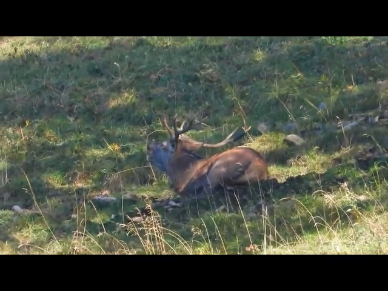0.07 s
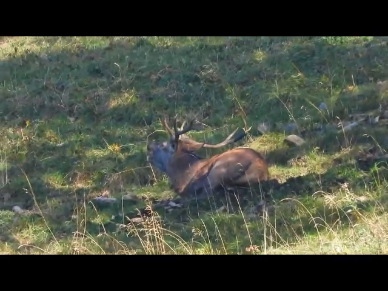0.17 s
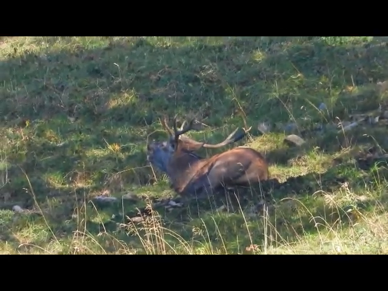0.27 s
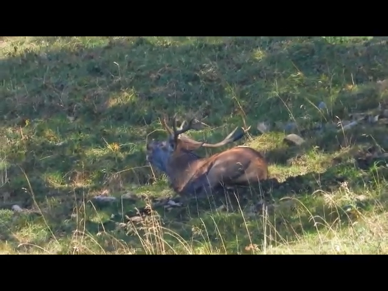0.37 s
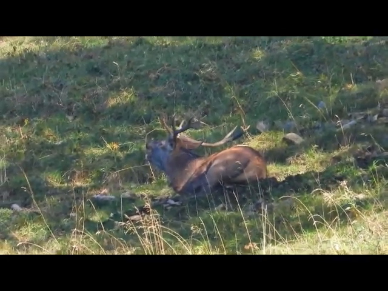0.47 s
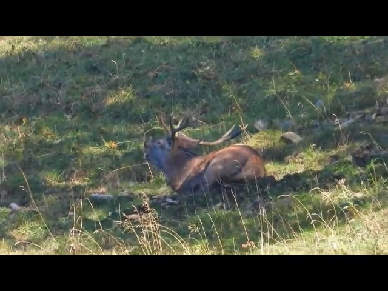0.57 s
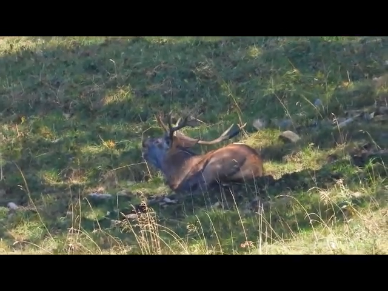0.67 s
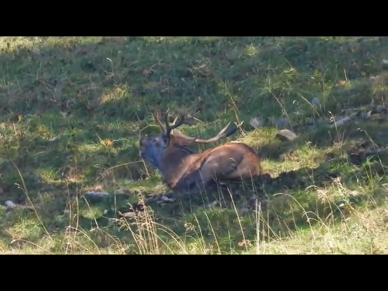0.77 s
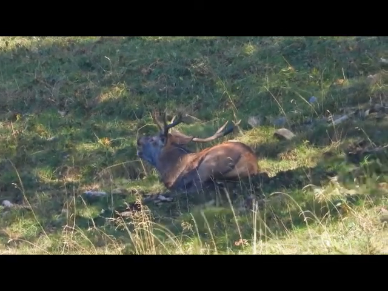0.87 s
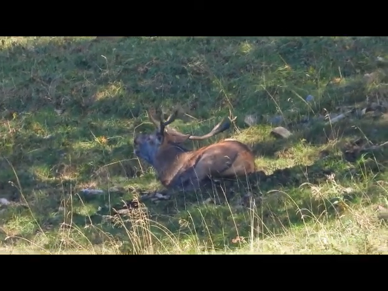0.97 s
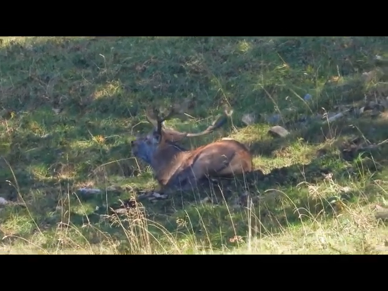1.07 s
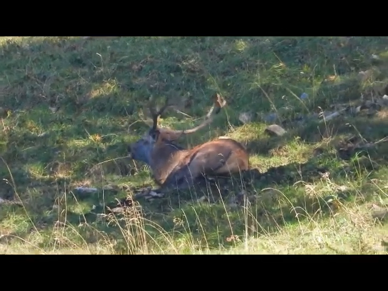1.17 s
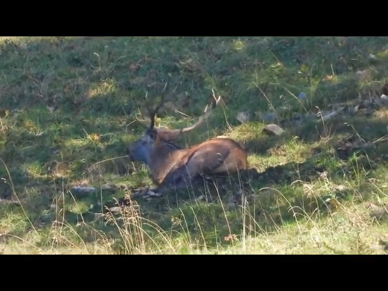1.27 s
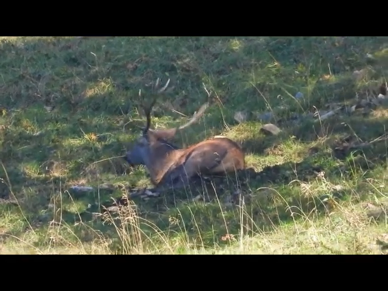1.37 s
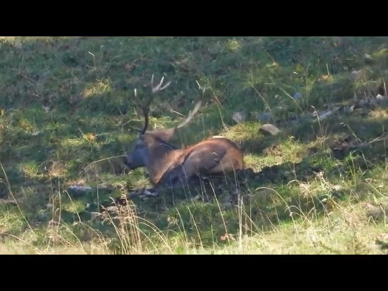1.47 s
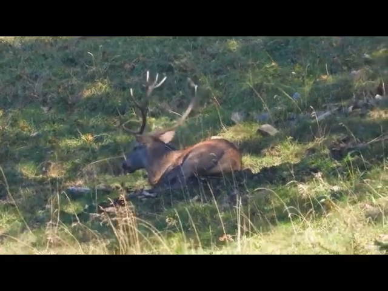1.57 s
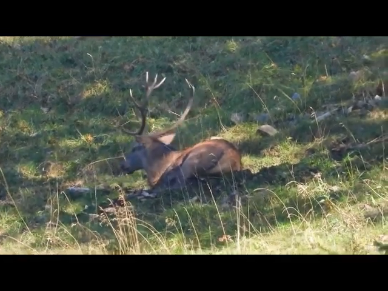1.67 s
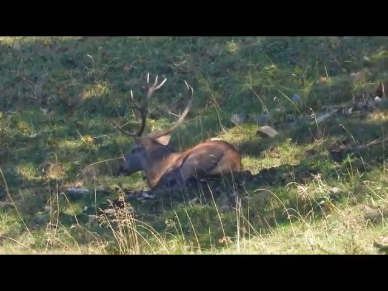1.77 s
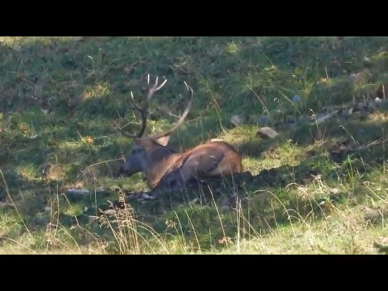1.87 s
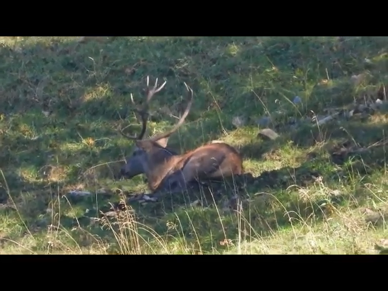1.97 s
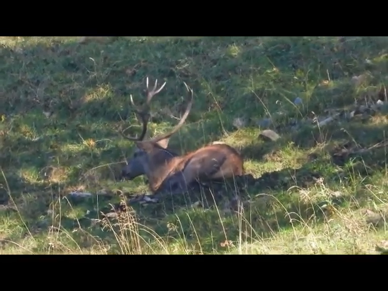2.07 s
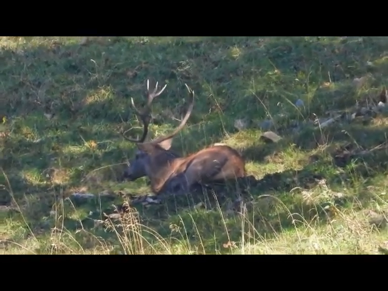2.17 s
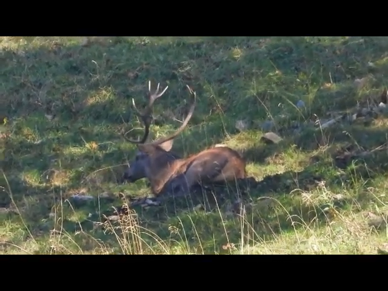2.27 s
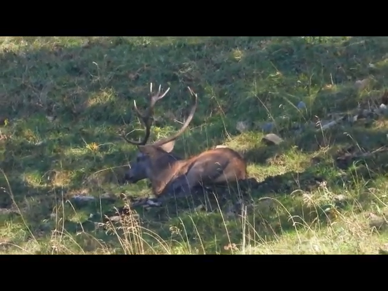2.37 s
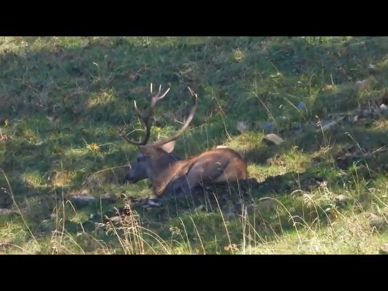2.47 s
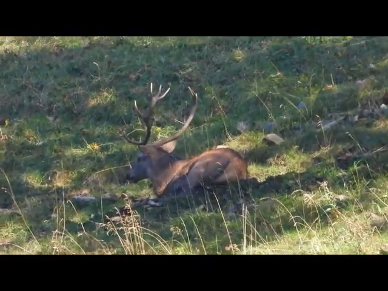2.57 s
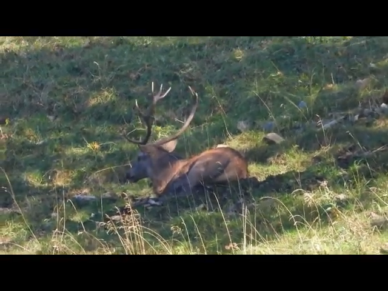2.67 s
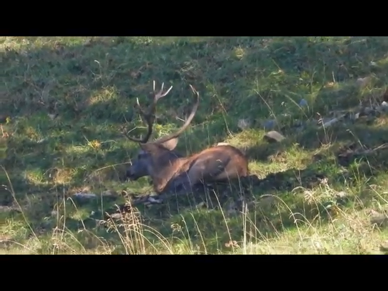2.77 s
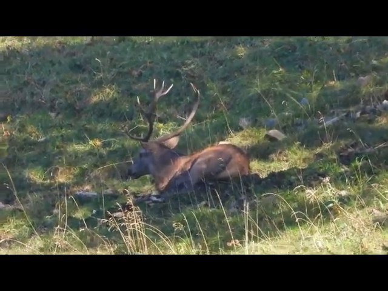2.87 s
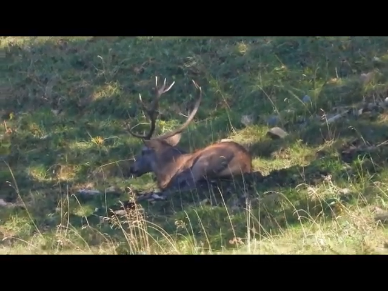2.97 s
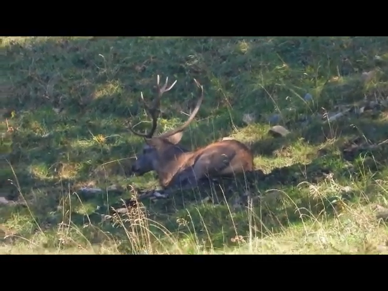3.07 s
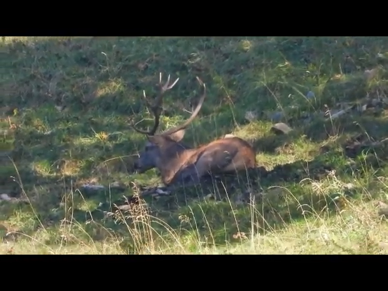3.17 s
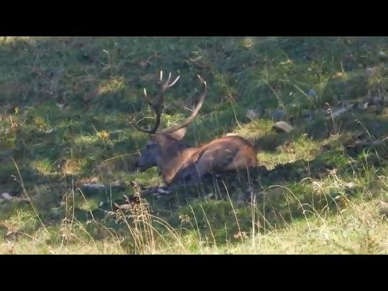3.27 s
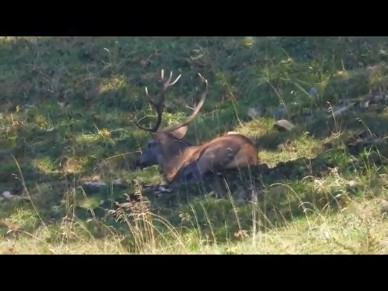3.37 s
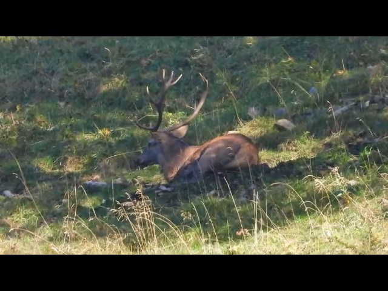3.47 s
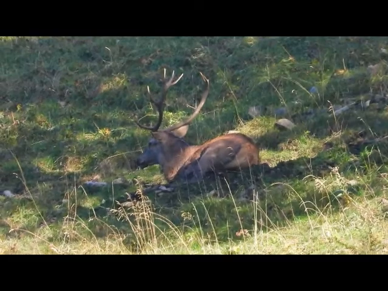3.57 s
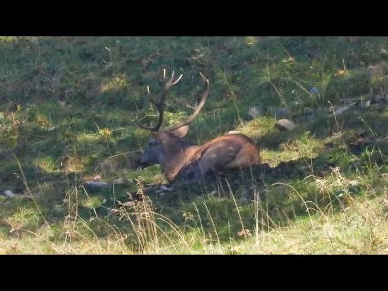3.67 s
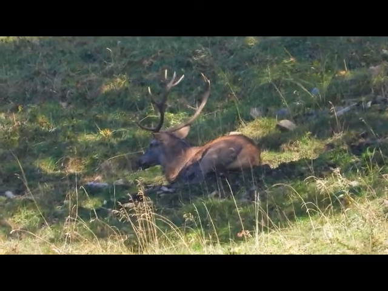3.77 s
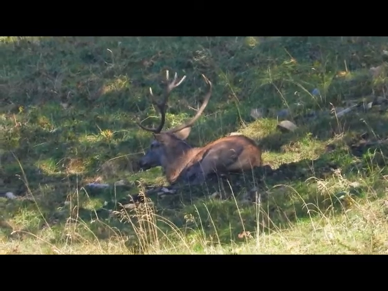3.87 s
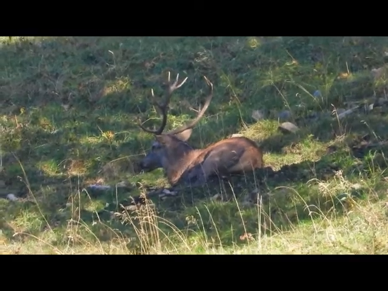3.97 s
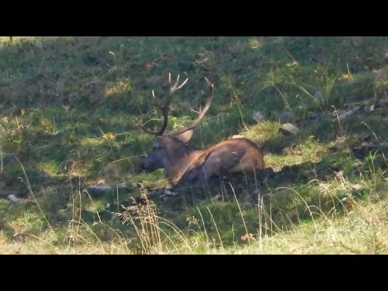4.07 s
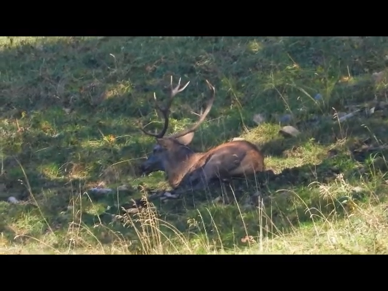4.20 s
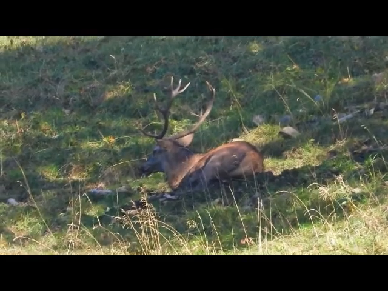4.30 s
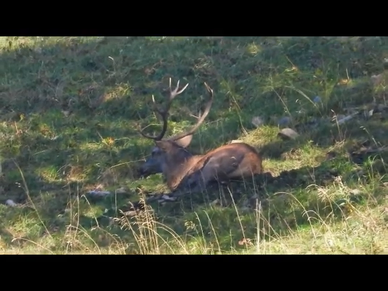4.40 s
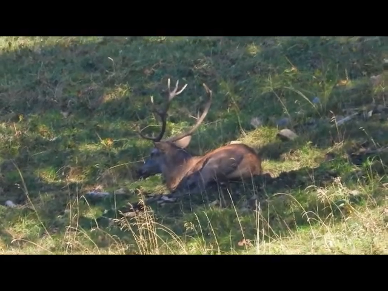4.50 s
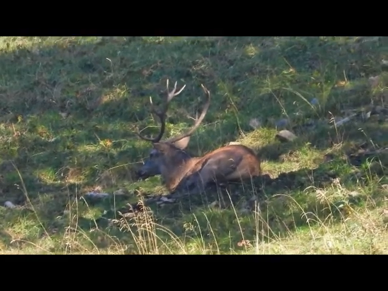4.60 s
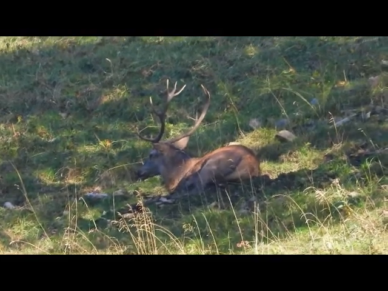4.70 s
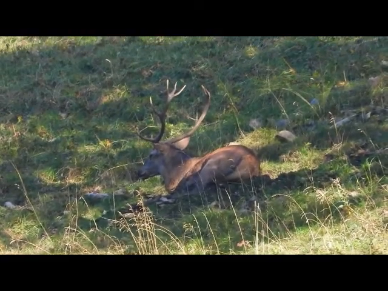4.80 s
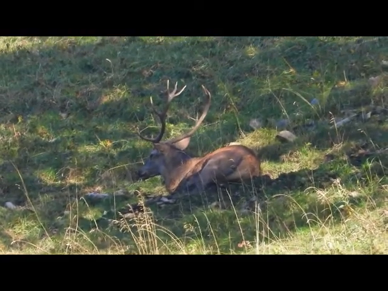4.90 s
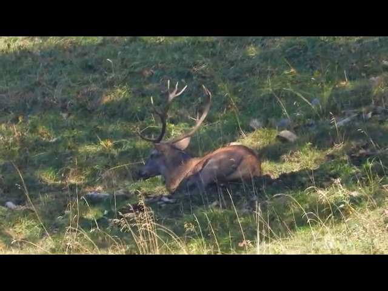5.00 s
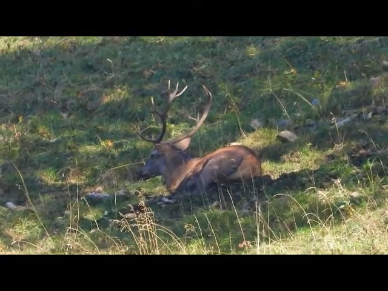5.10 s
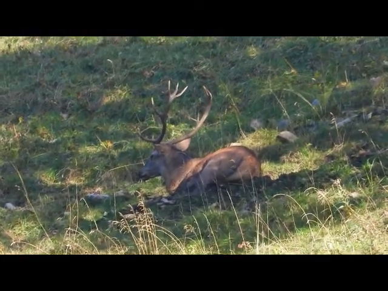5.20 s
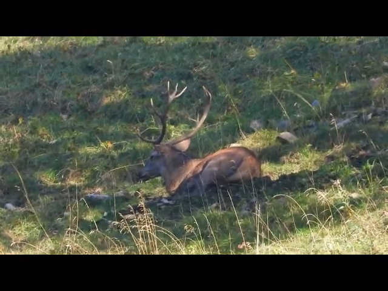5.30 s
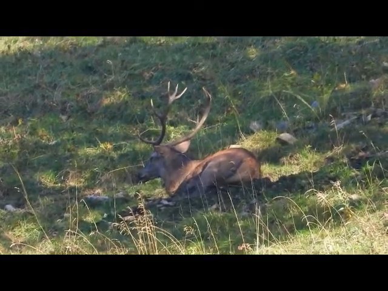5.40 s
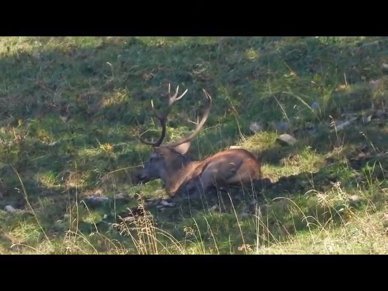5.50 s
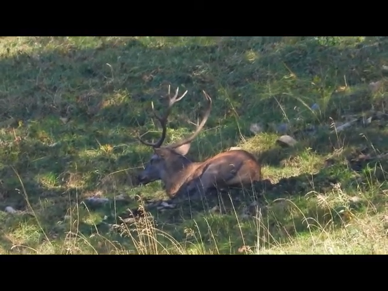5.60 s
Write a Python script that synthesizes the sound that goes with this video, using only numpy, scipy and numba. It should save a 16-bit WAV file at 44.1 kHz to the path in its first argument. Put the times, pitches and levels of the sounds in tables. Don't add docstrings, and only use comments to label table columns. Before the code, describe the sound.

The opening is mono and windy: rustling air over a slope, low thuds and flutters on the microphone, a faint high cricket hum and the fading echo of an earlier roar. A stag gives a full, rattling grunt from 0.23 to 0.55 s, rising then sagging and roughening, with short reflections off ground and hill. A weaker, lower grunt follows at 0.85-1.0 s. A third begins at 1.3 s, rising with hollow chest thumps and a strong gust, and is cut off at 1.4 s. Instantly the place becomes a quiet stereo wood edge. Small birds warble and give thin high whistles; a loud rising whip-crack call comes at 2.3, 3.1 and 5.1 s. From 2.5 s fluted thrush notes, falling finch twitters, hoarse chirps and rapid wren notes thicken the song. Tree echoes and a blurred distant chorus continue; chips close at 5.4-5.6 s.

```python
import sys
import numpy as np
from scipy import signal
from scipy.fft import rfft, irfft
from scipy.io import wavfile
from scipy.ndimage import uniform_filter1d
from numba import njit

SR = 44100
rng = np.random.default_rng(int(sys.argv[2]) if len(sys.argv) > 2 else 0)


def put_to_file(sound):
    columns = np.atleast_2d(sound).T
    safe = np.clip(columns, -1, 1)
    whole_steps = np.round(safe * 32767)
    wavfile.write(sys.argv[1], SR, whole_steps.astype(np.int16))


def natural_amplitude(level_db):
    exponent = np.asarray(level_db, float) / 20
    return 10 ** exponent


N = 249165
T = np.arange(N) / SR
SPLICE_S = 1.4155

# frequency in Hz, level in dB per Hz.
SLOPE_AIR = [(59, -26), (100, -28), (238, -5.5), (522, -1), (632, 1), (2070, -5), (2350, -4.5), (3910, -14),
             (5040, -15), (5610, -11), (5980, -17.5), (7230, -15.5), (15800, -32.5)]
# centre in seconds, half length in s, thud in dB, flutter above it in dB.
GUSTS = [
    (0.053, 0.1, -46.5, -26),
    (0.213, 0.018, -60, 22),
    (0.323, 0.065, -46, -5),
    (0.447, 0.09, -49, 17.5),
    (0.575, 0.098, -45, -38),
    (0.926, 0.081, -47.5, 4.5),
    (1.13, 0.34, -59, 7),
    (1.345, 0.051, -39.5, 13.5),
]
# frequency in Hz, width in Hz, level in dB.
CRICKET = (5530, 100.6, -52.5)

# time in seconds, pulse rate in Hz, effort in dB,
# windpipe resonance stretch (ratio), mouth brightness in dB.
GRUNTS = [
    [(.2318, 59.24, -19.5, 1.04, -1.5), (.256, 87.84, -16, 1.015, 2.5), (.288, 101.1, -13.5, 1.04, 2),
     (.375, 101.9, -14.5, 0.99, 4.5), (.42, 101, -15.5, 0.985, 5.5), (.45, 97.73, -11, 0.976, 0.5),
     (.482, 89.34, -11.5, 0.98, 3.5), (.505, 78.13, -18, 1.05, -2), (.521, 73.77, -17.5, 1.04, 0),
     (.536, 71.3, -17.5, 1.07, -6), (.552, 68.3, -22, 1.06, -11.5)],
    [(.8528, 58.9, -23.5, 0.99, 6.5), (.885, 67, -16.5, 1.02, -0.5), (.91, 69.6, -18.5, 0.94, -1),
     (.93, 64.74, -22.5, 1.05, 4.5), (.947, 62.1, -18.5, 1.05, 1), (.962, 69.5, -21.5, 1, -7),
     (1.0, 69, -36, 1.03, -14)],
    [(1.2985, 46.4, -21.5, 1.02, -4), (1.33, 67.6, -18.5, 0.97, 0.5), (1.345, 74.3, -16.5, 1.035, 0),
     (1.36, 81.27, -15.5, 0.98, -2), (1.39, 88.4, -17, 1.017, -0.5), (1.42, 90.8, -16.5, 1.005, -1.5)],
]
# frequency in Hz, width in Hz, level in dB.
WINDPIPES = [
    [(486, 33.5, 0.5), (645.4, 38, 6.5), (952, 26.7, 4.5), (1332, 23, 2.5), (1519, 24, -8),
     (1768, 64, -9.5), (2030, 52, -1.5), (2300, 120, -2), (2719, 100, -3.5), (2950, 75, -8),
     (3160, 53, -8.5), (3427, 59.6, -9.5)],
    [(568, 69, -4), (746, 32, 2), (935, 69, -13), (1113, 17.4, 7.5), (1510, 79, -8.5), (1750, 31, -10.5),
     (2144, 160, -12), (2504, 235, -8.5), (2650, 254, -14), (2900, 173, -12), (3460, 99, -19)],
    [(615, 37, 3.5), (765, 65, 3), (1027, 69, -6.5), (1322, 45, 3.5), (1495, 110, -2.5), (1750, 36, 4),
     (2154, 22, -2), (2345, 68, 2), (2603, 170, -3), (2920, 51, -1), (3296, 70, -10), (3550, 180, -11.5)],
]
MOUTH_GAINS = [
    [-0.27, -0.074, -0.15, -0.12, 1.2, -1.36, -1, 0.24, -0.049, 0.79, -0.31, 0.87],
    [.1, .1, .1, 0.075, 0.093, .1, .1, .1, .1, .1, .1],
    [.1, .1, .1, .1, .1, .1, .1, .1, .1, .1, .1, .1],
]
ROUGHNESS = [
    (.12, .5),
    (.2, .4),
    (.2, .25),
]
# centre in seconds, half length in s, change in dB.
BREATH_WAVERS = [
    (0.29, 0.036, -2),
    (0.465, 0.013, -4.5),
    (0.2, 0.028, 0),
    (0.28, .005, 3.5),
]
# frequency in Hz, width in Hz, level in dB.
NOSE = (4120, 480, -42)
# start in seconds, frequency in Hz, ring (T60) in s, level in dB.
CHEST_THUMPS = [
    (1.332, 417, 0.055, -18),
    (1.337, 241, .14, -22),
    (1.353, 325, 0.035, -33),
]

# frequency in Hz, level in dB per Hz.
WOOD_AIR = [(15, -35), (25, -3), (70, 1), (148, -11), (437, -11), (1400, -24), (2090, -25), (2810, -16),
            (3310, -15), (3590, -22), (5530, -22), (7240, -41), (8300, -43), (10000, -40), (15800, -37)]
# start in seconds, end in s, low edge in Hz, high edge in Hz, level in dB.
CHORUS = [(1.2, 1.69, 2870, 3420, -56.5), (1.3, 1.6, 6900, 7800, -69.5), (2.2, 2.35, 2780, 3350, -64.5),
          (2.44, 3.807, 3540, 5400, -52.5), (2.97, 4.298, 2430, 4470, -50.5), (2.904, 2.7, 6100, 6760, -48),
          (4, 4.42, 3700, 7600, -67), (4.96, 5.702, 2440, 3200, -64), (4.596, 5.26, 5750, 7160, -60.5),
          (5.203, 5.7, 3400, 5500, -54.5), (4.3, 5.05, 9800, 10600, -80), (3.75, 4.02, 9600, 10300, -79)]
# time in seconds, pitch in Hz, level in dB.
WARBLER_SHAPE = [(0, 2650, -4), (.06, 3320, -4), (.085, 3380, -1.5), (.13, 2950, 0.5), (.2, 2720, -7.5)]
# start in seconds, level in dB.
WARBLER = [
    (1.441, -56),
    (2.027, -56.5),
]
# start in seconds, length in s, start Hz, end Hz, level in dB.
PIPIT = [(1.545, 0.03, 6700, 4680, -47), (1.572, 0.13, 4730, 4520, -54), (1.71, 0.14, 3860, 3830, -65),
         (1.885, .12, 3820, 3750, -67), (2.09, 0.16, 3730, 3800, -66.5), (1.99, 0.072, 3230, 3250, -63.5),
         (2.69, 0.025, 5400, 5650, -56), (2.72, 0.022, 5600, 4600, -60), (4.238, 0.041, 3300, 4010, -52),
         (4.275, 0.053, 4250, 4420, -50.5), (4.335, 0.053, 4360, 4600, -67), (4.46, 0.012, 5250, 5800, -50),
         (5.485, 0.024, 3900, 3980, -50), (5.587, .04, 4200, 4960, -52), (3.3, .09, 4300, 2290, -46),
         (3.515, .075, 4700, 2250, -48.5), (3.228, .035, 4900, 6730, -59), (3.437, .028, 5400, 6890, -59),
         (3.642, .028, 5500, 6460, -65.5), (3.75, .04, 4700, 2700, -57), (3.89, .03, 4300, 2750, -61),
         (4.098, .025, 4400, 3310, -58), (2.943, .03, 4300, 3360, -53), (2.74, 0.069, 5070, 4880, -50.5),
         (2.8, 0.027, 5040, 4380, -59), (3.165, 0.05, 5180, 4800, -45), (2.527, 0.061, 4390, 2900, -72),
         (4.36, 0.031, 5050, 4550, -51), (4.44, 0.019, 6000, 5100, -56), (4.555, 0.028, 4100, 4580, -54),
         (4.58, 0.019, 4520, 4570, -48), (4.736, 0.056, 4110, 5000, -50.5), (5.105, 0.057, 5140, 4710, -50),
         (5.23, 0.022, 5150, 4250, -51), (5.32, 0.033, 5120, 3390, -54)]
# start in seconds, length in s, low edge in Hz, high edge in Hz, level in dB.
SCRATCHES = [
    (1.545, 0.027, 4300, 13000, -56),
    (1.75, 0.02, 4000, 12000, -58),
    (2.318, 0.031, 3800, 12000, -50),
    (3.138, 0.035, 4600, 14000, -49),
    (5.069, 0.04, 3200, 14000, -49),
]
# start in seconds, length in s, start Hz, end Hz, level in dB.
TREECREEPER = [(1.75, 0.015, 6700, 4890, -44.5), (2.69, 0.11, 7540, 7180, -57),
               (2.765, 0.065, 7470, 6380, -55), (2.7, 0.15, 6900, 5680, -55), (2.95, 0.12, 7020, 7200, -58),
               (2.668, 0.043, 7500, 5920, -63), (3.83, 0.058, 5370, 5560, -61),
               (3.99, 0.06, 7550, 6360, -66.5), (4.03, 0.2, 6550, 6070, -60.5),
               (4.49, 0.11, 7600, 7320, -58), (4.565, 0.082, 7350, 6380, -52.5),
               (4.5, 0.14, 6980, 5420, -55), (4.74, 0.013, 6300, 4940, -50),
               (4.885, 0.021, 6560, 4780, -50), (4.9, 0.13, 7800, 7250, -68.5),
               (5.415, 0.014, 5550, 6000, -73), (5.428, 0.235, 5990, 5785, -57.5)]
# time in seconds, pitch in Hz, level in dB.
TIT_SHAPE = [(0, 4360, -10), (.012, 5720, 5), (.03, 6230, 1.5), (.08, 6080, -1), (.105, 5560, 0)]
# first and last start in seconds, gap in s, gap growth in s a syllable, level in dB.
TIT = (1.785, 2.7, .147, 0, -61)
# time in seconds, pitch in Hz, level in dB.
WHIP_SHAPE = [(0, 1750, -34), (.012, 2412, -18), (0.03, 3286, -10.5), (.041, 4155, -3.5),
              (0.051, 4389, 4.5), (.085, 4250, -2.5), (0.094, 4250, -7)]
# start in seconds, level in dB, length of the held part (ratio).
WHIP = [
    (2.317, -28.5, 0.89),
    (3.141, -25.5, 0.72),
    (5.068, -26.5, 1),
]
# multiple of the pitch, dB while rising, dB while held.
WHIP_OVERTONES = [(1.45, -13, -60), (2, -4, -45), (3, -24, -39), (4, -30, -48)]
# time in seconds, pitch in Hz, level in dB.
FINCH_SHAPE = [(0, 4830, 1), (.008, 4243, 3), (.022, 3305, -2.5), (.034, 2900, -3.5), (.05, 2854, -21.5)]
# first and last start in seconds, gap in s, gap growth in s a syllable, level in dB.
FINCH = (2.519, 3.12, .1065, .0012, -53)
# start in seconds, length in s, start Hz, end Hz, level in dB.
THRUSH = [(2.53, 0.065, 1376, 1655, -49.5), (2.61, 0.081, 2236, 1633, -49), (2.96, .07, 2150, 2300, -46.5),
          (3.04, 0.076, 2250, 1872, -42.5), (3.25, 0.059, 2650, 2604, -50), (3.46, 0.054, 2610, 2600, -54),
          (3.6, .08, 2300, 2390, -57), (3.643, 0.16, 1725, 1983, -44), (3.78, 0.24, 1942, 2030, -42.5),
          (4.02, 0.05, 2030, 1390, -42), (4.27, 0.044, 1963, 2360, -45), (4.31, 0.047, 2310, 2263, -39.5),
          (4.345, 0.098, 2320, 1514, -42.5), (4.49, 0.079, 2415, 2577, -45),
          (4.59, 0.097, 1953, 2190, -43.5), (4.9, 0.054, 2168, 2080, -41), (5.02, 0.043, 2130, 2070, -59),
          (5.15, 0.098, 2155, 1972, -48), (5.24, 0.049, 2088, 1750, -50)]
# start in seconds, end in s, centre in Hz, swing in Hz, level in dB.
THRUSH_WARBLES = [
    (2.937, 3.386, 2143, 330, -59),
    (4.548, 5.262, 2270, 245, -51),
]
# start in seconds, length in s, start Hz, end Hz,
# level in dB.
HOARSE = [(2.635, 0.035, 4300, 2800, -58), (2.74, .04, 4400, 2900, -55), (2.845, .04, 4400, 2900, -55),
          (2.945, .04, 4200, 3200, -53), (3.125, 0.035, 4000, 3000, -51), (3.225, .04, 4900, 6600, -55),
          (3.3, 0.085, 4300, 2280, -50), (3.435, .03, 5400, 6900, -57), (3.515, 0.07, 4700, 2300, -48),
          (3.64, .03, 5500, 6600, -58), (3.68, 0.1, 3700, 3650, -54), (3.75, .04, 4700, 2700, -54),
          (3.86, .03, 4400, 4450, -56), (3.89, .03, 4200, 2800, -56), (4.098, .025, 4400, 3300, -55),
          (4.74, .14, 2450, 2950, -56), (4.25, .18, 3700, 3700, -61)]
# time in seconds, pitch in Hz, level in dB.
WREN_SHAPE = [(0, 5240, -16), (.006, 5240, 3.5), (.016, 4750, 2)]
# first and last start in seconds, gap in s, gap growth in s a syllable, level in dB.
WREN = (3.29, 3.9, .085, 0, -61)
# time in seconds, pitch in Hz, level in dB.
CHIP_SHAPE = [(0, 3450, 0.0053), (.014, 4750, 0), (.028, 3350, 0)]
# start in seconds, level in dB.
CHIP = [
    (5.445, -58),
    (5.49, -59),
    (5.628, -49),
]
# nearness in dB, left minus right in dB, near branches in dB, far trees in dB, flutter in dB.
SEATS = dict(thrush=(4.5, -1, -1.5, 1, 3), pipit=(-2.5, -3.5, -0.5, 0, 3),
         creeper=(-0.5, 0.5, 1, -0.5, 3.5), tit=(1, -3, 4.5, 8.5, 0.5), finch=(3, -9, -1.5, -1.5, 3.5),
         wren=(5, -9, -2, 2, 4), whip=(-3.5, -2.5, -7, -16, 1.5), hoarse=(5, -3.5, -1.5, -5, 3))
LEFT_LAG_MS = dict(thrush=.215, pipit=.03, creeper=0, tit=.07, finch=-.07, wren=-.04, whip=-.033, hoarse=-.04)


def level(x, db):
    return x * natural_amplitude(db) / np.sqrt(np.mean(x ** 2))


def noise():
    return rng.standard_normal(N)


def band(x, lo_hz, hi_hz, order=2):
    return signal.sosfilt(signal.butter(order, [lo_hz, hi_hz], "band", fs=SR, output="sos"), x)


@njit
def ring(x, hz, width):
    y, b, l = np.empty(len(x)), 0., 0.
    for i in range(len(x)):
        g, k = np.tan(np.pi * hz[i] / SR), width / hz[i]
        v = (b + g * (x[i] - l)) / (1 + g * (g + k))
        b, l, y[i] = 2 * v - b, l + 2 * g * v, k * v
    return y


def ring_twice(x, hz, width, skirt):
    return ring(ring(x, hz, 1. * width), hz, 1. * skirt)


def walk(rate):
    k = int(SR / rate)
    steps = np.repeat(rng.standard_normal(N // k + 1), k)
    return 1.3 * uniform_filter1d(uniform_filter1d(steps, k), k)[:N]


def coloured(spectrum):
    hz, db = np.transpose(spectrum)
    f = np.maximum(np.arange(N // 2 + 1) * SR / N, 1)
    return irfft(rfft(noise()) * natural_amplitude(np.interp(np.log(f), np.log(hz), db)), N)


def echoes(x, t60, onset_s):
    t = T[:SR]
    tail = rng.standard_normal(SR) * (1 - np.exp(-t / onset_s)) * natural_amplitude(-60 * t / t60)
    tail = (tail / np.sqrt(np.sum(tail ** 2))).reshape((1,) * (x.ndim - 1) + (SR,))
    return signal.fftconvolve(x, tail, axes=-1)[..., :N]


def gusts():
    s, half, db, above_db = np.transpose(GUSTS)[:, :, None]
    swell = np.exp(-((T - s) / half) ** 2)
    thud_gain = natural_amplitude(-67) + np.sum(swell * natural_amplitude(db), axis=0)
    flutter_gain = natural_amplitude(-52.5) + np.sum(swell * natural_amplitude(db + above_db - 7.5), axis=0)
    thud = level(band(noise(), 22, 90), 0) * thud_gain * natural_amplitude(walk(26))
    return thud + level(band(noise(), 100, 550), 0) * flutter_gain


def cricket():
    hz, width, db = CRICKET
    hum = ring_twice(noise(), hz * (1 + .002 * walk(12)), width, width)
    return level(hum * natural_amplitude(4.5 * np.sin(2 * np.pi * 31.5 * T)), db)


def slope():
    air = level(coloured(SLOPE_AIR), -40.5) * natural_amplitude(0.17 * walk(22))
    return air + gusts() + cricket()


def throat(source, modes, stretch, bright_db=0., mouth_gain=None):
    out = 0
    for k, (hz, width, db) in enumerate(modes):
        centre = hz * stretch ** min(1582 / hz, 1)
        mouth_db = bright_db * min(hz / 2000, 1)
        if mouth_gain:
            mouth_db = mouth_db + mouth_gain[k] * np.clip(bright_db, -4, 6)
        late = int(min(hz / 2100, 1) * .002 * SR)
        mode = np.roll(ring_twice(source, centre, width, 983), late)
        out = out + (-1) ** k * mode * natural_amplitude(db + mouth_db)
    return out


def grunt(table, modes, roughness, mouth_gain):
    s, *columns = np.transpose(table)
    at = slice(int(s[0] * SR), int((s[-1] + .15) * SR))
    hz, db, stretch, bright_db = (np.interp(T[at], s, c) for c in columns)
    fresh, spent = roughness
    rough = fresh + (spent - fresh) * np.clip((T[at] - s[0]) / (s[-1] - s[0]), 0, 1) ** 4
    phase = np.cumsum(hz) / SR
    cycle = phase.astype(int)
    closures = np.diff(cycle, prepend=-1) * np.sqrt(SR / hz)
    size = natural_amplitude(4 * rough * rng.standard_normal(N // 400)[cycle])
    puff = np.exp(-(phase - cycle) / 0.83) * rng.standard_normal(len(hz))
    db = db + sum(d * np.exp(-((T[at] - t) / half) ** 2) for t, half, d in BREATH_WAVERS)
    effort = size * natural_amplitude(db) * (T[at] < s[-1])
    unit = np.sqrt(sum(natural_amplitude(2 * d) * w for _, w, d in modes) * np.pi / SR)
    voiced = throat(effort * (closures + 2.5 * rough * puff), modes, stretch, bright_db, mouth_gain)
    voiced = band(voiced / unit, 60, 3800, order=5)
    rasp = natural_amplitude(-25) * band(effort * puff, 3800, 14300)
    nose_hz, nose_width, nose_db = NOSE
    nose = level(ring(effort * puff, nose_hz * stretch, 1. * nose_width), nose_db)
    out = np.zeros(N)
    out[at] = voiced + rasp + nose * np.std(voiced) * 4
    return out


def thumps():
    out = np.zeros(N)
    for s, hz, t60, db in CHEST_THUMPS:
        t = np.maximum(T - s, 0)
        out += natural_amplitude(db + 4 - 60 * t / t60) * (1 - np.exp(-t / 0.0079)) * np.sin(2 * np.pi * hz * t)
    return out


def stag():
    voice = sum(grunt(*g) for g in zip(GRUNTS, WINDPIPES, ROUGHNESS, MOUTH_GAINS))
    ground = natural_amplitude(-8.5) * band(echoes(voice, 0.04, 0.0017), 1490, 3400)
    voice = voice + ground + thumps()
    earlier = level(throat(noise(), WINDPIPES[0], np.ones(N)), -29) * natural_amplitude(-60 * T / 1.5)
    return voice + natural_amplitude(-17) * echoes(voice, 0.89, 0.013) + band(earlier, 270, 2950)


def wood_air():
    shared = coloured(WOOD_AIR)
    common = 0.41 * shared + 0.27 * band(shared, 15, 280, order=1)
    return level(np.array([common + coloured(WOOD_AIR) for _ in range(2)]), -51)


def chorus():
    out = np.zeros((2, N))
    for t0, t1, lo_hz, hi_hz, db in CHORUS:
        outside = np.maximum(np.maximum(t0 - T, T - t1), 0)
        voices = level(band(rng.standard_normal((2, N)), lo_hz, hi_hz, order=3), db)
        out += voices * natural_amplitude(2 * walk(7) - 107 * outside)
    return out


def whistle(table, start=0., gain_db=0., overtones=()):
    s, hz, db = np.transpose(table)
    at = slice(int((start + s[0]) * SR), int((start + s[-1]) * SR))
    t = T[at] - start
    pitch = uniform_filter1d(np.interp(t, s, hz), size=130)
    phase = 2 * np.pi * np.cumsum(pitch) / SR
    held = np.clip((pitch / hz.max() - .9) / .09, 0, 1)
    wave = np.sin(phase)
    for k, rising_db, held_db in overtones:
        audible = k * pitch < SR / 2.5
        wave = wave + natural_amplitude(rising_db + (held_db - rising_db) * held) * np.sin(k * phase) * audible
    ends = np.clip(np.minimum(t - t[0], t[-1] - t) / 0.0024, 0, 1)
    out = np.zeros(N)
    out[at] = np.sqrt(2) * wave * ends * natural_amplitude(np.interp(t, s, db) + gain_db)
    return out


def again(shape, starts):
    return sum(whistle(shape, s, db) for s, db in starts)


def notes(rows, settle):
    u = np.linspace(0, 1, 12)
    out = np.zeros(N)
    for s, length, from_hz, to_hz, db in rows:
        pitch = to_hz + (from_hz - to_hz) * (1 - u) ** settle
        out += whistle(np.transpose([s + u * length, pitch, db - 4 * u ** 2]))
    return out


def small_birds():
    return again(WARBLER_SHAPE, WARBLER) + notes(PIPIT, 1.4) + again(CHIP_SHAPE, CHIP)


def scratches():
    out = np.zeros(N)
    for s, length, lo_hz, hi_hz, db in SCRATCHES:
        shape = np.sin(np.pi * np.clip((T - s) / length, 0, 1))
        burst = band(noise(), lo_hz, hi_hz) + 5.6 * band(noise(), lo_hz, 5800)
        out += shape * level(burst, db)
    return out


def treecreeper():
    return notes(TREECREEPER, 0.97)


def song(first, last, gap, growth, db):
    k = np.arange(30)
    s = first + gap * k + growth * k ** 2 / 2
    s = s[s < last]
    return zip(s, db - 4.5 * (2 * (s - first) / (last - first) - 1) ** 2)


def whips():
    s, hz, db = np.transpose(WHIP_SHAPE)
    held_s = .049
    out = np.zeros(N)
    for start, gain_db, held in WHIP:
        times = np.minimum(s, held_s) + held * np.maximum(s - held_s, 0)
        out += whistle(np.transpose([times, hz, db]), start, gain_db, WHIP_OVERTONES)
    return out


def thrush():
    turns = 34 * T + 1.5 * walk(7.2)
    out = notes(THRUSH, 1.6)
    for t0, t1, hz, swing_hz, db in THRUSH_WARBLES:
        s = np.linspace(t0, t1, 240)
        depth = swing_hz * (1 + 0.35 * np.interp(s, T, walk(15)))
        pitch = hz + depth * np.sin(2 * np.pi * np.interp(s, T, turns))
        out += whistle(np.transpose([s, pitch, np.full(240, db)]))
    return band(out, 1852, 2900, order=3)


def hoarse():
    out = np.zeros(N)
    for s, length, from_hz, to_hz, db in HOARSE:
        u = np.clip((T - s) / length, 0, 1)
        centre = from_hz + (to_hz - from_hz) * u
        out += np.sin(np.pi * u) * level(ring_twice(noise(), centre, 300, 300), db)
    return out


def seated(voice, lag_ms, gain_db, pan_db, near_db, far_db, flutter_db):
    voice = voice * natural_amplitude(gain_db + flutter_db * walk(12 * max(flutter_db, 1.5) ** 2))
    left = np.interp(T - lag_ms / 1000, T, voice) * natural_amplitude(pan_db / 2)
    pair = np.array([left, voice * natural_amplitude(-pan_db / 2)])
    return pair, pair * natural_amplitude(near_db), pair * natural_amplitude(far_db)


def bounce(near, far):
    return echoes(near, 0.17, 0.0023) + band(echoes(far, 1.24, 0.043), 330, 7800)


def wood():
    songs = dict(pipit=small_birds(), creeper=treecreeper(), tit=again(TIT_SHAPE, song(*TIT)), whip=whips(),
                 finch=again(FINCH_SHAPE, song(*FINCH)), thrush=thrush(), hoarse=scratches() + hoarse(),
                 wren=again(WREN_SHAPE, song(*WREN)))
    places = [seated(songs[k], LEFT_LAG_MS[k], *SEATS[k]) for k in SEATS]
    direct, near, far = (sum(parts) for parts in zip(*places))
    same_side = 0.74
    own = np.array([bounce(near[c], far[c]) for c in range(2)])
    trees = np.sqrt(same_side) * bounce(near, far) + np.sqrt(1 - same_side) * own
    return direct + trees + chorus() + wood_air()


def thinned(x):
    pair = np.array([x[0] + x[1], x[0] - x[1]]) / 2
    f, _, z = signal.stft(pair, SR, nperseg=2048)
    power = np.abs(z) ** 2
    below = np.roll(uniform_filter1d(power, size=90, axis=1), 60, axis=1)
    limit = np.maximum(natural_amplitude(2 * -108), below * natural_amplitude(2 * -23))
    z = z * ((uniform_filter1d(power, size=5, axis=1) > limit) | (f[:, None] < 6160))
    mid, side = signal.istft(z, SR, nperseg=2048)[1][:, :N]
    return np.array([mid + side, mid - side])


def scene():
    hill = slope() + stag()
    hill = hill + natural_amplitude(-7.5) * np.diff(hill, prepend=0) * np.cos(2 * np.pi * 12100 * T)
    fade = np.clip((SPLICE_S - T) / 0.002, 0, 1)
    return fade * hill + (1 - fade) * thinned(wood())


def low_pass(x):
    return signal.sosfilt(signal.butter(12, 15990, fs=SR, output="sos"), x)


def record(dry):
    soft = 1.5 * np.tanh(dry / 1.5)
    cut = signal.sosfilt(signal.ellip(10, .2, 70, 15750, fs=SR, output="sos"), soft)
    return low_pass(cut)


dry = scene()
out = record(dry)
put_to_file(out)
```